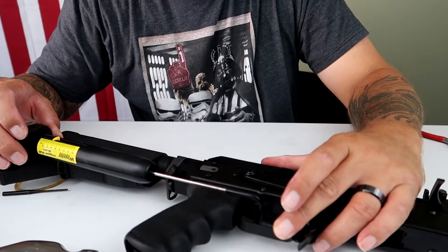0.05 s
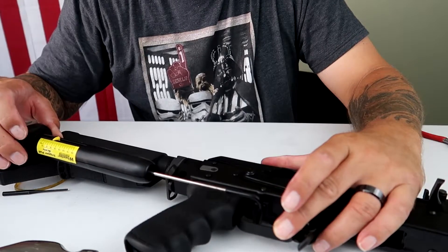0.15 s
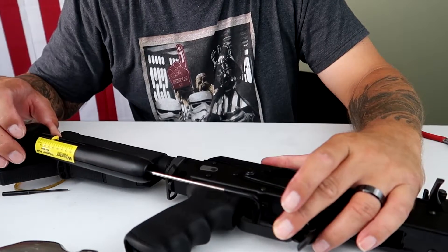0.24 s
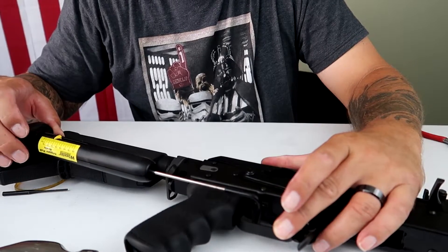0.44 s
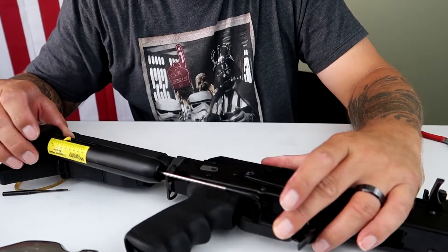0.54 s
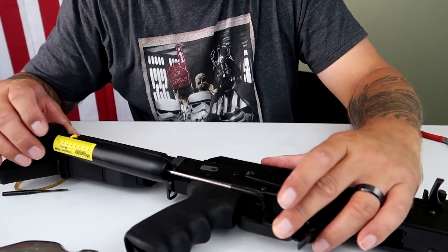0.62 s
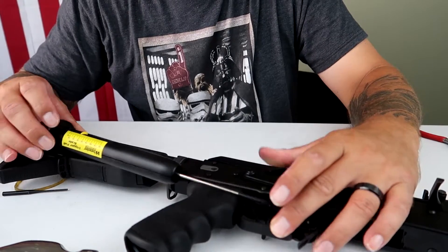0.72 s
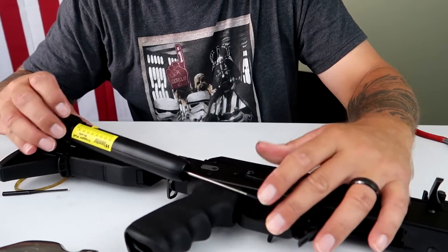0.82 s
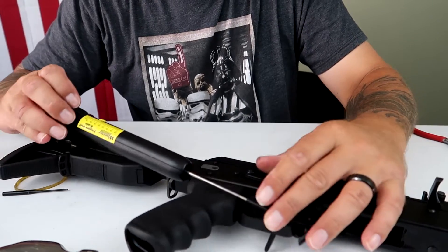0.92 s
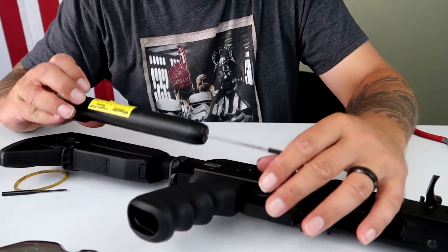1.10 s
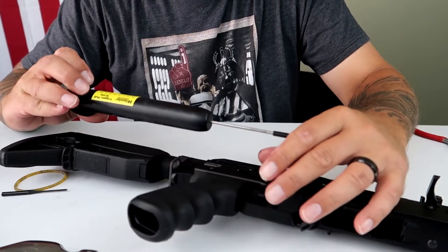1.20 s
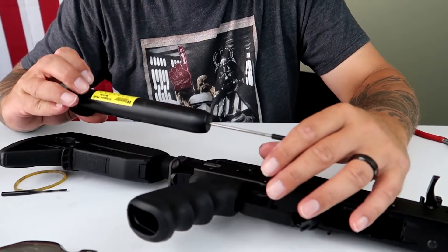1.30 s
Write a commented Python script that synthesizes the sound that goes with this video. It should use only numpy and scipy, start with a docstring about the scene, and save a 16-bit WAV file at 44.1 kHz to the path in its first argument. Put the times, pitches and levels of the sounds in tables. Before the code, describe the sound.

A rifle hammer falls at about 0.24 seconds: a rapid chatter of steel contacts, loud and clipped, with a short table thud. Before it, low mains hum and a brief cloth rustle at the start. The gain then ducks, nearly erasing hum. Faint rod ticks and sliding follow at 0.65-0.9, soft double knock at 1.15, then a muffled drag until 1.35. Close, small dry room.

```python
"""Rifle hammer falling on a table

A rifle lies on a hard table close by in a small room, over mains hum, room tone and a brief rustle of cloth.
Its hammer falls in a burst of ringing steel contacts that overloads the input; the gain control ducks, so hum
and room tone almost vanish. A steel rod then ticks and slides on the gun, built from decaying modes and noise
grains, and something knocks softly and drags on the table."""
import sys
import numpy as np
from scipy import signal
from scipy.fft import rfft, irfft, next_fast_len
from scipy.io import wavfile
from scipy.ndimage import uniform_filter1d

SR = 44100
rng = np.random.default_rng(int(sys.argv[2]) if len(sys.argv) > 2 else 0)


def volts_from_db(level):
    """Convert decibel levels to linear amplitude ratios."""
    exponent = np.asarray(level, float) / 20
    return 10 ** exponent


def to_wav(sig):
    """Store sig (one row per channel, or 1-D mono) as 16-bit WAV at the path in sys.argv[1].

    Samples outside -1..1 are clipped; the rate is SR.
    """
    pcm = np.clip(np.atleast_2d(sig), -1, 1) * 32767
    pcm = np.round(pcm).astype(np.int16)
    wavfile.write(sys.argv[1], SR, pcm.T)  # frames by channels


N = 59535
GRAINS_PER_S = 15000

# Noise of a blow or shudder on the table. Each row: frequency in Hz, relative level in dB.
KNOCK_CRACK = [(75, -55), (115, -27.5), (360, -0.5), (900, -10), (2300, -20), (4500, -39.5), (9000, -83)]
# Stereo width of room air and hiss. Each row: frequency in Hz, side over mid in dB.
WIDE_AIR = [(60, -34.5), (240, -8.5), (950, -5), (3770, -5), (15000, 11.5)]


def unit(x):
    """Scales each channel to rms 1."""
    return x / np.sqrt(np.mean(x ** 2, axis=-1, keepdims=True) + 1e-20)


def along(points, hz):
    """Reads a curve of (Hz, value) points on a log frequency axis."""
    f, v = np.transpose(points)
    return np.interp(np.log(hz + 1), np.log(f + 1), v)


def shaped(x, points):
    """Colours x in the spectrum by a curve of (Hz, dB) points."""
    size = next_fast_len(x.shape[-1] + 8192)
    gain = volts_from_db(along(points, np.fft.rfftfreq(size, 1 / SR)))
    return irfft(rfft(x, size) * gain, size)[..., :x.shape[-1]]


def stereo(pair, wide):
    """Makes left and right from a mid signal and a separately drawn side signal."""
    mid, side = pair[0], shaped(pair[1], wide)
    return np.array([mid + side, mid - side])


def rub(level, colour, per_s):
    """Friction as many small random grains in one colour, under a (seconds, dB) level curve."""
    s, db = np.transpose(level)
    grains = (rng.random((2, N)) < per_s / SR) * rng.standard_normal((2, N))
    level_db = np.interp(np.arange(N) / SR, s, db, -120, -120)
    return unit(shaped(grains, colour)) * volts_from_db(level_db)


def ring(modes, t, weight_db, share, blur_hz):
    """Two draws of a body's modes dying away, each blurred in pitch by a wandering phase."""
    hz, db, t60 = np.transpose(modes)[:, :, None]
    steps = rng.standard_normal((2, len(modes), len(t)))
    walk = np.cumsum(steps, axis=2) * np.sqrt(2 * np.pi * blur_hz / SR)
    walk = uniform_filter1d(walk, size=40, axis=2)
    level_db = db + weight_db(hz) + 2 * rng.standard_normal((2, len(modes), 1))
    decay_db = -60 * t / np.clip(share * t60, .003, .8)
    return (volts_from_db(level_db + decay_db) * np.sin(2 * np.pi * hz * t + walk)).sum(axis=1)


def strikes(rows, modes, rise_s, blur_hz, fall_db=8.0, colour=None, crack_db=0, crack_s=1):
    """Each contact rings the modes anew, most near its strongest pitch, and may add a short noisy crack."""
    out = np.zeros((2, N + SR))
    t = np.arange(int(.4 * SR)) / SR
    curve_hz = np.geomspace(30, 20000, 60)
    for s, db, top_hz, *touch in rows:
        # fall is in dB per octave squared; share scales the decay times
        fall, share = touch or (fall_db, 1)
        weight_db = lambda hz: -fall * np.log2(hz / top_hz) ** 2
        hit = ring(modes, t, weight_db, share, blur_hz)
        if colour:
            crack_curve = [(hz, along(colour, hz) + weight_db(hz)) for hz in curve_hz]
            noise = unit(shaped(rng.standard_normal((2, len(t))), crack_curve))
            hit = hit + noise * volts_from_db(crack_db - 60 * t / (share * crack_s))
        rise = 1 - np.exp(-(t / rise_s) ** 2)
        out[:, round(s * SR):][:, :len(t)] += volts_from_db(db) * hit * rise
    return out[:, :N]


def room(x, wet_db):
    """Adds a noise tail in which each frequency dies at its own speed, first fast, then slowly."""
    # Decay of the small room. Each row: frequency in Hz, t60 in seconds.
    decay = [(100, 0.05), (1250, 0.1), (1550, 0.22), (4000, 0.23), (8000, 0.3), (11000, 0.22),
             (14000, 0.14)]
    far_db, far_longer = -19.5, 2.2  # the next room answers weaker and longer
    hz, _, noise = signal.stft(rng.standard_normal((2, SR // 2)), SR, nperseg=256)
    fall_db = -60 * np.abs(_) / along(decay, hz)[:, None]
    envelope = volts_from_db(fall_db) + volts_from_db(far_db + fall_db / far_longer)
    tail = signal.istft(noise * envelope, SR, nperseg=256)[1]
    delayed = np.pad(x, ((0, 0), (130, 0)))  # the tail starts about 3 ms late
    late = signal.fftconvolve(delayed, tail / np.linalg.norm(tail[0]), axes=1)[:, :N]
    return x + volts_from_db(wet_db) * late


def air():
    """Mains hum as steady sines, over room tone as coloured noise and a brief grainy rustle of cloth."""
    # Mains hum. Each row: frequency in Hz, level in dB rms before the low cut and ducking.
    hum_tones = [(59.2, -54), (118.4, -41.5), (183.0, -63), (242.2, -55.5)]
    # Room tone colour. Each row: frequency in Hz, relative level in dB.
    tone_colour = [(30, -26), (70, -22.5), (124, -13.5), (242, -17.5), (650, -30), (2300, -35.5),
                   (15000, -52.5)]
    # Hand on cloth. Each row: time in seconds, level in dB.
    rustle = [(0, -61.5), (.022, -46.5), (.05, -51.5), (.11, -69.5)]
    # Cloth colour. Each row: frequency in Hz, relative level in dB.
    cloth = [(200, -9.5), (800, 4.5), (3000, -2.5), (6000, -5.5), (11000, -18.5), (15000, -40)]
    t = np.arange(N) / SR
    hum = sum(np.sqrt(2) * volts_from_db(db) * np.sin(2 * np.pi * (hz * t + rng.random())) for hz, db in hum_tones)
    tone = volts_from_db(-51.5) * unit(shaped(rng.standard_normal((2, N)), tone_colour))
    return hum + stereo(tone + rub(rustle, cloth, per_s=17000), WIDE_AIR)


def hammer():
    """The hammer strikes and chatters, ringing the steel; the stock thuds on the table, left side first."""
    # Hammer contacts. Each row: start in seconds, relative level in dB, strongest frequency in Hz.
    contacts = [(.2246, -24, 3150), (.2279, -7, 1500), (.2303, -1.5, 2390), (.2343, 2, 2800),
                (.2383, 17, 3530), (.2402, 26.5, 2410), (.2425, 27.5, 3000), (.2450, 30.5, 3780),
                (.2480, 16, 3460)]
    # Steel modes of the action. Each row: frequency in Hz, relative level in dB, t60 in seconds.
    action = [(1705, -3.5, 0.15), (2780, -2.5, .1), (3160, -5.5, 0.12), (3870, -2, 0.13),
              (4520, -12.5, 0.15), (8550, -16.5, 0.088), (11250, -15, 0.094)]
    # Noise of the steel contacts. Each row: frequency in Hz, relative level in dB.
    crack = [(400, -24), (850, -8), (1280, -13.5), (1690, -11), (9500, -22), (12300, -17), (13100, -30),
             (14600, -23), (15500, -99)]
    # The stock jumps on the table. Each row: start in seconds, relative level in dB, strongest frequency in Hz,
    # fall-off in dB per octave squared, share of the ring length.
    thuds = [(.2276, -5, 480, 18.5, 15), (.2340, -0.5, 480, 14, 3.6), (.2380, 31.5, 262.5, 4, 1.2)]
    # Stock on the table. Each row: frequency in Hz, relative level in dB, t60 in seconds before the share.
    stock = [(101.77, -4.5, 0.03), (270, -1.5, 0.014), (465, -1.5, 0.011), (127.4, -18, 0.2)]
    # The gun shudders on the table, then rests. Each row: time in seconds, level in dB.
    shudder = [(.245, -2.5), (.325, -7), (.36, -32)]
    # Stereo width of the blows. Each row: frequency in Hz, side over mid in dB.
    wide = [(550, -7.5), (1650, -19), (4970, -1.5), (15000, 10)]
    blows = volts_from_db(-23.5) * strikes(contacts, action, rise_s=0.00022, blur_hz=200, fall_db=2.34,
                                 colour=crack, crack_db=20.0, crack_s=0.029)
    on_table = strikes(thuds, stock, rise_s=0.001, blur_hz=4.3) + rub(shudder, KNOCK_CRACK, GRAINS_PER_S)
    thud = room(on_table, wet_db=-8.5)[0]
    lag_s = 0.00063  # the thud reaches the right microphone later
    thud_pair = np.array([thud, np.roll(thud, round(lag_s * SR))])
    return stereo(room(blows, wet_db=0.0), wide) - thud_pair


def rod():
    """The steel rod ticks as ringing modes and slides in small grains along the gun, which rocks."""
    # Rod ticks. Each row: start in seconds, relative level in dB, strongest frequency in Hz,
    # fall-off in dB per octave squared, share of the ring length.
    tick_rows = [(.535, -31, 1091, 80, 3.25), (.576, -28, 1111, 80, 1.96), (.6553, -2, 1797, 11.5, 0.36),
                 (.7095, -19.5, 1050, 37, 1.1), (.7098, -17, 4345, 19, 0.41), (.7528, 6.5, 2810, 2.1, 0.69),
                 (.8345, -9, 3397, 2, .3), (.846, -25, 2280, 28, 0.3), (.893, -22, 2298, 0.5, 0.47),
                 (1.3225, -14, 3800, 10, 0.13)]
    # Rod modes. Each row: frequency in Hz, relative level in dB, t60 in seconds before the share.
    rod_modes = [(1069, -8, 0.18), (2063, 3.5, 0.047), (2403, -8.5, 0.16), (3024, 0.5, 0.063),
                 (3400, -7, 0.049), (3990, -2.5, 0.025)]
    # Noise of the ticks. Each row: frequency in Hz, relative level in dB.
    crack = [(700, -30.5), (1100, -9.5), (1600, -13), (2600, -9.5), (4500, -16), (8000, -25), (14000, -38)]
    # The gun rocks on the table. Each row: start in seconds, relative level in dB, strongest frequency in Hz.
    rock = [(.760, -17, 257)]
    # Barrel modes. Each row: frequency in Hz, relative level in dB, t60 in seconds.
    barrel = [(187, -6, 0.54), (495, 0.5, 0.35)]
    # Rod sliding. Each row: time in seconds, level in dB.
    slide = [(.665, -60.5), (.68, -28), (.745, -27.5), (.87, -28.5), (.92, -59.5), (1.10, -68),
             (1.13, -66.5)]
    # Colour of the slide. Each row: frequency in Hz, relative level in dB.
    scrape = [(500, -21), (1100, -10), (1600, -13), (2300, -4.5), (4200, -18.5), (8000, -32)]
    # Stereo width of the rod. Each row: frequency in Hz, side over mid in dB.
    wide = [(380, -77), (2380, -16.5), (15000, 12)]
    ticks = volts_from_db(-2.5) * strikes(tick_rows, rod_modes, rise_s=0.0004, blur_hz=67,
                                colour=crack, crack_db=1.5, crack_s=0.053)
    rocking = strikes(rock, barrel, rise_s=0.002, blur_hz=30)
    sliding = rub(slide, scrape, GRAINS_PER_S)
    return stereo(room(ticks + rocking + sliding, wet_db=-7.5), wide)


def table():
    """Soft knocks ring the modes of the table top, then something drags on it in small grains."""
    # Knocks. Each row: start in seconds, relative level in dB, strongest frequency in Hz.
    knock_rows = [(1.1437, 2.5, 900), (1.149, 0.5, 590), (1.188, -11, 513), (1.243, -18, 488.6)]
    # Table top modes. Each row: frequency in Hz, relative level in dB, t60 in seconds.
    table_top = [(122, 4.5, 0.25), (219.8, -6, 0.52), (322, -9.5, 0.3), (515, 2.5, 0.19), (778, 6, 0.14),
                 (1306, -2.5, 0.18), (1569, -2, 0.09), (2361, 2.5, 0.029)]
    # Something drags on the table. Each row: time in seconds, level in dB.
    drag = [(1.15, -34), (1.20, -22.5), (1.26, -23.5), (1.31, -26.5), (1.35, -38)]
    # Colour of the drag. Each row: frequency in Hz, relative level in dB.
    drag_colour = [(70, -43.5), (120, -2), (210, -2.5), (600, -4), (1400, -14.5), (4000, -51.5)]
    # Stereo width of the table. Each row: frequency in Hz, side over mid in dB.
    wide = [(380, -56), (2380, -14), (15000, 7.5)]
    knocks = volts_from_db(-11.5) * strikes(knock_rows, table_top, rise_s=0.00064, blur_hz=28.6, fall_db=0.06,
                                  colour=KNOCK_CRACK, crack_db=10.0, crack_s=0.1)
    dragging = rub(drag, drag_colour, per_s=3300)
    return stereo(room(knocks + dragging, wet_db=-8.5), wide)


def scene():
    """All sources summed at the microphones."""
    return air() + hammer() + rod() + table()


def band_limit(x):
    """A steep low-pass at the top of the band."""
    return signal.sosfilt(signal.butter(12, 18000, fs=SR, output="sos"), x)


def record(dry):
    """Low cut; gain control ducks on loud peaks and creeps back; then hiss, soft clipping and coupling."""
    # Hiss colour. Each row: frequency in Hz, relative level in dB.
    hiss_colour = [(180, -34.5), (300, -4.5), (416, -4.5), (1520, -11.5), (2210, -6.5), (2780, -10.5),
                   (15000, -32.5)]
    low_cut_hz, coupling_hz = 51, 6
    duck_from_db, duck_most_db, duck_s, recover_db_per_s = -3, 38.5, 0.004, 6.5
    dry = signal.sosfilt(signal.butter(2, low_cut_hz, "high", fs=SR, output="sos"), dry)

    peak_db = 20 * np.log10(np.abs(dry).max(axis=0) + 1e-9)
    over_db = np.clip(peak_db - duck_from_db, 0, duck_most_db)
    # the greatest duck so far, less what has been recovered since
    back_db = recover_db_per_s * np.arange(N) / SR
    held_db = np.maximum.accumulate(over_db + back_db) - back_db
    smooth = np.exp(-1 / (duck_s * SR))
    ducked = dry * volts_from_db(-signal.lfilter([1 - smooth], [1, -smooth], held_db))

    hiss = volts_from_db(-73) * stereo(unit(shaped(rng.standard_normal((2, N)), hiss_colour)), WIDE_AIR)
    mix = ducked + hiss
    mix = mix / (1 + np.abs(mix) ** 8) ** (1 / 8)  # the input overloads
    mix = signal.sosfilt(signal.butter(1, coupling_hz, "high", fs=SR, output="sos"), mix)
    return band_limit(np.clip(mix, -1, 1))


dry = scene()
out = record(dry)
to_wav(out)
```